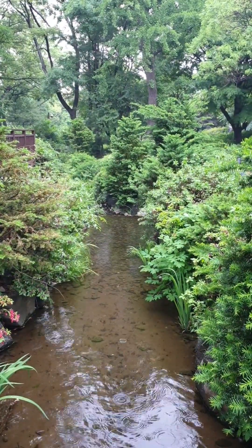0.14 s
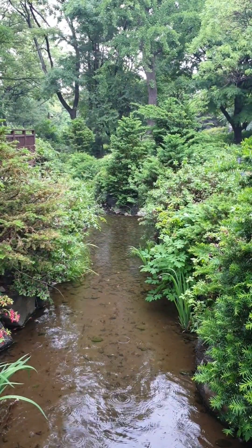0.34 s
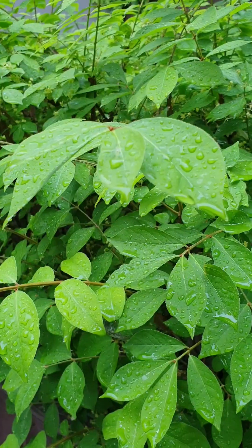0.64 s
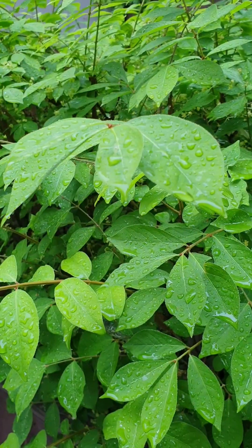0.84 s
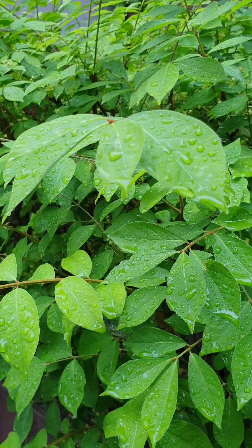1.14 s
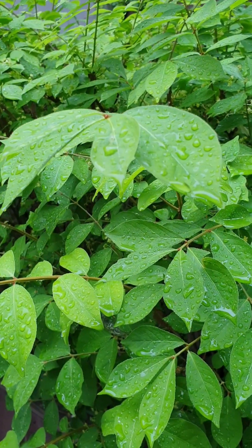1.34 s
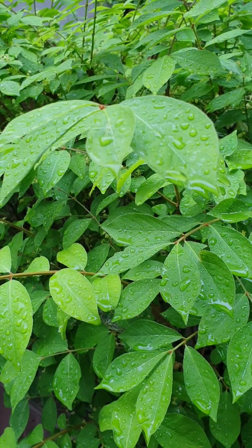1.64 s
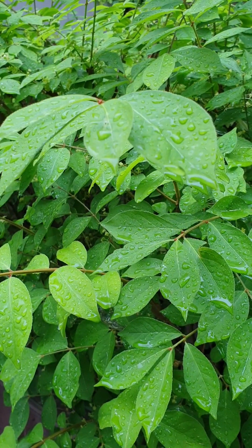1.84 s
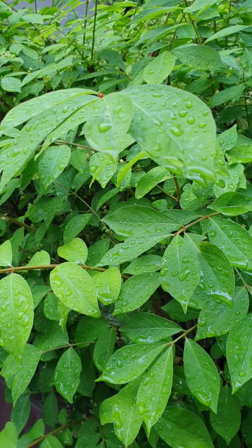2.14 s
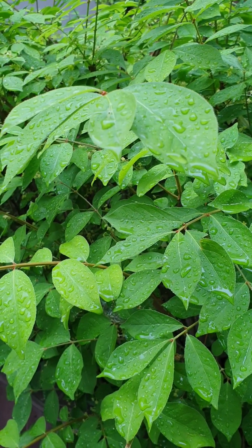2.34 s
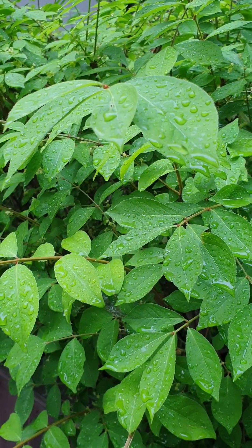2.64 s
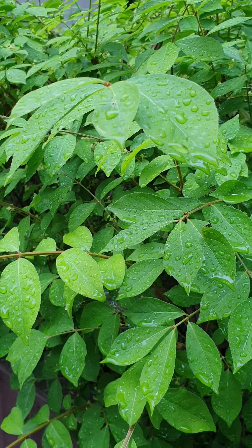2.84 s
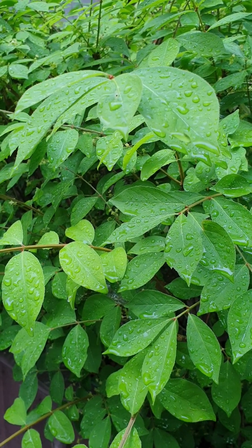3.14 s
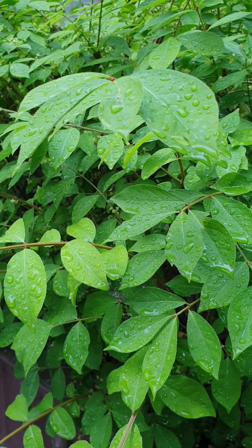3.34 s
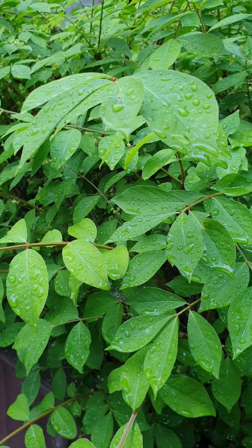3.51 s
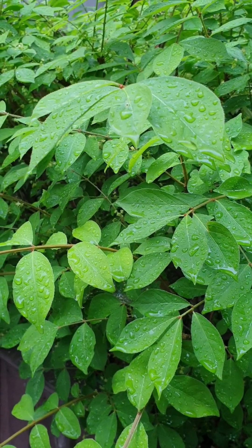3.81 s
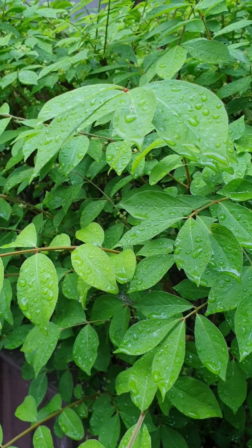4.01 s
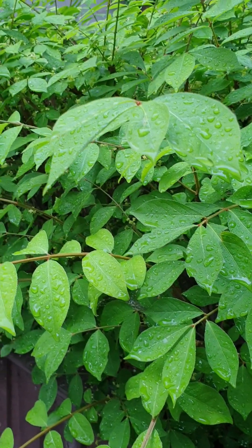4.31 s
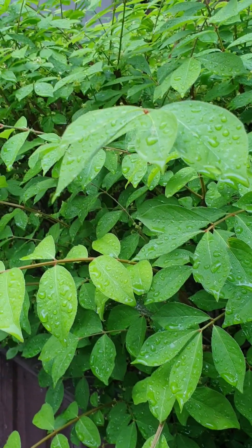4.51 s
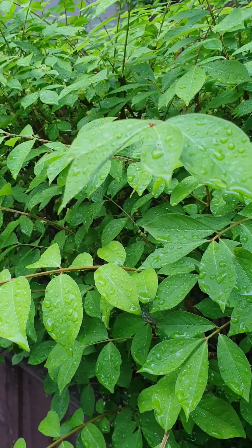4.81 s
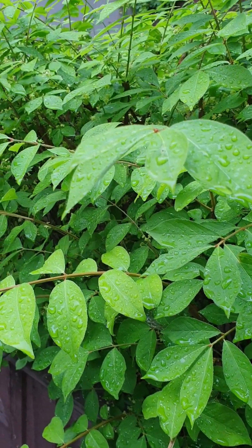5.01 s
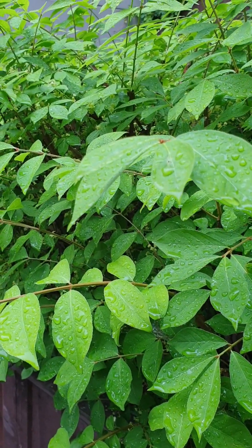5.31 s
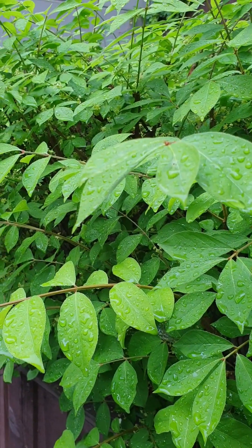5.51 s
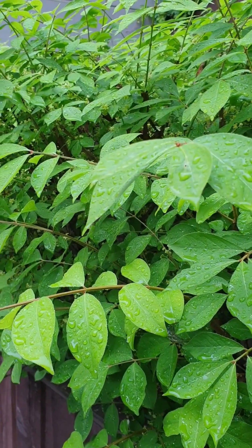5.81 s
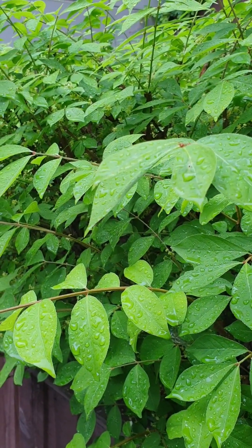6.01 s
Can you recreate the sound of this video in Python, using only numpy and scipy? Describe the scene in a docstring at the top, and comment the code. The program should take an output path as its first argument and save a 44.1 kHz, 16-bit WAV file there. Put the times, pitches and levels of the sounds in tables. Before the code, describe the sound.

Rushing, bubbly water fills both sides for half a second, then is chopped off. A far softer wet hush follows, with deep distant rumble and sparse, barely audible bird notes. From about two and a half seconds the level rises; gliding whistles, hoarse churrs and thin high seeps become clearer, blurred by foliage. Sharp little drops tap leaves on the right, more often near the end.

```python
"""Stream, then wet thicket

Close by a rain-fed stream, a roar of shaped noise under thousands of tiny bubbles is cut off after half a second.
After a short gap the microphones stand in a wet thicket: far rumble and hush are drifting noise,
whose recording level rises about 10 dB between 2.4 and 3.3 s.
Small birds near and far are gliding, fluttering sines blurred by scattering taps for the foliage.
Drops tick on leaves to the right, each a click ringing four damped modes."""
import sys
import numpy as np
from scipy import signal
from scipy.io import wavfile
from scipy.ndimage import uniform_filter1d

SR = 44100
rng = np.random.default_rng(int(sys.argv[2]) if len(sys.argv) > 2 else 0)


def dump_mix(stems):
    """Bounce the given channels to the path in sys.argv[1] as a 16-bit WAV at rate SR."""
    frames = np.atleast_2d(stems).T  # one column per channel
    limited = np.clip(frames, -1, 1)  # hard clip at full scale
    pcm = np.round(limited * 32767).astype(np.int16)
    wavfile.write(sys.argv[1], SR, pcm)


N = 271215  # samples, 6.15 s

# Relative spectrum of the close stream: (frequency [Hz], density [dB per Hz])
STREAM_SPECTRUM = [(15, -37.5), (25, -9), (69, 0), (124, -9.5), (184, -8), (267, -14), (331, -10),
                   (594, -14), (2080, -14.5), (3630, -16), (7070, -17), (11700, -20), (14500, -25)]
# Likeness of the stream's two channels: (frequency [Hz], correlation [-1 to 1])
STREAM_LIKENESS = [(60, 0.9), (120, 0.91), (240, 0.88), (470, 0.67), (930, 0.2), (1850, 0.16),
                   (3660, 0.082), (7270, 0.08), (14400, 0.01)]
# Sideways balance of the stream: (frequency [Hz], left minus right [dB])
STREAM_BALANCE = [(60, -2), (150, 0), (370, 0.5), (930, 1.5), (2320, -4.5), (5790, 2), (14400, 0.5)]
# Relative spectrum of the thicket air before the level rise: (frequency [Hz], density [dB per Hz])
HUSH_SPECTRUM = [(20, -35), (38, -12.5), (58, 2.5), (85, -9.5), (130, -11), (220, -16.5), (560, -32.5),
                 (860, -27.5), (1500, -41), (2800, -48), (5000, -49.5), (8600, -63.5), (12000, -53.5),
                 (14500, -55.5)]
# Likeness of the thicket's two channels: (frequency [Hz], correlation [-1 to 1])
HUSH_LIKENESS = [(60, 0.87), (120, 0.97), (240, 0.93), (470, 0.58), (930, 0.4), (1850, 0), (3660, 0.01),
                 (7270, 0.071), (14400, 0.0)]
# Sideways balance of the thicket air: (frequency [Hz], left minus right [dB])
HUSH_BALANCE = [(60, -1), (180, -2), (540, 3), (1610, -3), (4820, -1), (14400, -1.0)]
# Thicket level over time:
# (time [s], hush level [dB], extra rumble [dB], extra birdsong haze [dB], extra hiss [dB])
THICKET_LEVEL = [(.62, -74, 0.5, 2.5, 0.5), (1.4, -73, -3, -3, 2.5), (2.2, -73, 2, -2.5, 1),
                 (2.45, -72.5, -1, 1, 3), (2.62, -69.5, -1, 7.5, -2.5), (2.9, -66, 2, -2, 2.5),
                 (3.3, -63.5, -4, 2.5, 4.5), (3.7, -64, 2, 8.5, 6), (3.9, -63.5, 1, 5.5, -3),
                 (4.5, -63.5, 0.5, 1, 3.5), (5, -63.5, -7.5, 5.5, 1), (5.5, -64.5, 1.5, 4, -0.5),
                 (5.85, -63, -3, 0.5, 2.5), (6.15, -64, -2, 3, 0)]
# Drops landing on leaves, before panning and scatter:
# (time [s], peak level [dB], left minus right [dB], brightness [dB per octave])
LEAF_DROPS = [(0.733, -70, -11, -4), (0.9438, -66, -5.5, -3), (0.965, -64, -4.5, -5), (1.1744, -72, -2, 1),
              (1.5494, -68, -1.0, 1), (1.5953, -63, -15, -8), (2.4546, -64, -10, -4),
              (2.5222, -59.5, -2.0, -1), (3.4299, -62, -3.5, 6), (3.5357, -55, -2, 7), (3.7636, -57, -4, 1),
              (4.196, -56, -3.5, -2), (4.7084, -62, -3.0, 4), (4.9504, -53, -11, 1.5),
              (5.007, -57.5, -15, -5), (5.21, -55, -14, 0), (5.2839, -52, -8, -5), (5.3467, -54, -2.0, 1),
              (5.7228, -48.5, -9, -2.5), (5.7584, -55, -3, -1), (5.8552, -57.5, -4.0, -5)]
# Ringing modes of a leaf: (frequency [Hz], width [Hz], relative level [dB])
LEAF_MODES = [(2580, 1300, 2.5), (3920, 1100, -10), (6810, 550, -11), (11700, 1700, -9)]
# Hoarse two-voiced churrs, upper voice before panning and scatter:
# (time [s], level [dB], start pitch [Hz], length [s], lower voice against upper [dB])
CHURR_CALLS = [(0.816, -78, 4230, .04, -10), (1.561, -82, 4290, .065, -5), (2.514, -77, 4400, .045, -5),
               (3.016, -81, 4200, 0.1, 8.5), (3.442, -72.5, 4220, 0.083, 3.5),
               (3.961, -65.5, 4220, 0.098, -3), (4.515, -63.5, 4250, 0.073, -3.5),
               (4.72, -67, 4740, .082, -3), (5.187, -61, 4150, 0.055, -2.5), (5.95, -63.5, 4315, 0.052, -2),
               (5.992, -70.5, 4100, 0.073, 3.5)]
# Notes of three far birds, level at the note's start before waver, panning and leaves:
# (time [s], length [s], level [dB], start pitch [Hz], end pitch [Hz])
CHUP_NOTES = [(.83, 0.16, -85.5, 2900, 2660), (1.61, .17, -84.5, 2800, 2500),
              (2.55, 0.067, -81, 2900, 2700), (2.78, 0.12, -82.5, 2900, 2880),
              (4.29, 0.21, -74.5, 3260, 3200), (4.58, 0.18, -71, 2960, 3200),
              (4.74, 0.085, -71, 2820, 2650), (4.84, .15, -76, 2895, 2880), (5.0, 0.15, -80.5, 2790, 2910),
              (5.235, 0.057, -69, 2793, 2770), (5.35, 0.13, -76.5, 2640, 2540), (5.6, .1, -75, 3050, 2990),
              (5.69, .11, -75, 2884, 2300)]
WHISTLE_NOTES = [(.85, .08, -83, 4000, 4150), (.96, 0.077, -82, 4090, 4070), (1.3, .04, -94, 4100, 4080),
                 (1.36, 0.072, -88, 4060, 4000), (2.22, 0.11, -88, 4360, 3870),
                 (2.39, .11, -95, 4180, 4080), (2.56, .08, -80, 3980, 4280), (2.63, .11, -70.5, 4260, 4490),
                 (2.74, 0.097, -78, 4300, 4260), (2.97, .18, -71, 4300, 4610),
                 (3.17, 0.16, -75.5, 4410, 4280), (3.34, .11, -69, 4310, 4530),
                 (3.45, .09, -68, 4400, 4210), (3.56, .09, -69, 4250, 4420), (3.66, 0.14, -71, 4290, 4390),
                 (3.845, 0.067, -65, 4330, 4350), (4.02, .17, -65, 4040, 4430),
                 (4.22, .13, -61, 3840, 4290), (4.33, .19, -65.5, 4310, 4140), (4.56, .15, -63, 3800, 4300),
                 (4.7, .15, -66.5, 4250, 4150), (5.01, .09, -74, 3860, 3900), (5.1, .09, -69, 4180, 4150),
                 (5.23, 0.063, -71, 4200, 4080), (5.38, 0.2, -74, 4400, 4330),
                 (5.575, .09, -69, 3780, 3910), (5.88, 0.065, -71, 4400, 4250)]
SEEP_NOTES = [(3.55, 0.085, -71.5, 6440, 6600), (3.65, 0.18, -74.5, 6760, 5900),
              (3.66, .13, -68, 4840, 5090), (3.845, 0.088, -73.5, 6350, 6600),
              (3.95, 0.078, -73, 6110, 5780), (4.06, .14, -85, 5850, 6000), (4.72, 0.1, -72, 5930, 5750),
              (4.847, 0.063, -69.5, 6230, 6000), (4.867, .09, -70, 4370, 5950),
              (4.96, 0.097, -72, 6700, 6600), (5.08, .2, -77, 6640, 6220), (5.91, .15, -74.5, 5660, 5700)]
# Low falling chucks, upper voice before panning and scatter: (time [s], level [dB])
CHUCK_CALLS = [(1.011, -74.5), (1.291, -74), (1.366, -70.5), (2.291, -79), (2.659, -63), (2.744, -60.5)]
# Clear single-voiced pipes, before panning and scatter:
# (time [s], level [dB], start pitch [Hz], end pitch [Hz], length [s])
PIPE_CALLS = [(2.999, -80.5, 3800, 3800, .04), (4.044, -71, 3880, 4470, .12),
              (4.203, -64.5, 3800, 4320, 0.12), (4.562, -69, 3810, 4430, 0.13),
              (4.693, -73, 3150, 3120, .05), (4.97, -78.5, 6770, 6900, 0.14),
              (5.013, -75, 3800, 3790, 0.036), (5.203, -60, 3880, 3850, 0.016),
              (6.03, -72, 3440, 3550, .03), (6.065, -69, 3680, 3800, .045)]

HOP = 1024  # samples between short-time spectra
RUSH_DB, FIZZ_DB = -29, -8  # whole stream rms; bubbles against the roar
FIZZ_PER_S = 4000  # average bubbles per second in each channel
CUT_S, CUT_DB, CUT_DB_PER_S, GONE_S = 0.558, -9, 702.5, 0.579  # stream drops, fades, is silent
HUSH_START_S = 0.614
NOTE_END_S, NOTE_WAVER_DB = 0.015, 3  # closing ramp; rms level waver of far notes
EDGE_HZ = 14600  # upper band limit


def gain_of(db):
    """Decibels to gain."""
    return 10 ** (np.asarray(db) / 20)


def evened(x):
    """Scales to rms 1."""
    return x / np.sqrt(np.mean(x ** 2) + 1e-20)


def read(points, hz):
    """Reads a curve on a log-frequency axis."""
    f, value = np.transpose(points)
    return np.interp(np.log(hz + 1), np.log(f + 1), value)


def add(mix, s, sound):
    """Mixes a stereo sound in at time s, cut at the end of the mix."""
    part = mix[:, round(s * SR):][:, :sound.shape[1]]
    part += sound[:, :part.shape[1]]


def panned(x, pan_db):
    """Splits the left-right level difference over both channels."""
    return np.array([x * gain_of(pan_db / 2), x * gain_of(-pan_db / 2)])


def flutter(n, smooth_s):
    """Random wandering of rms 1: white noise through a one-pole smoother."""
    return evened(signal.lfilter([1], [1, -np.exp(-1 / (smooth_s * SR))], rng.standard_normal(n)))


def noise(colour, likeness, balance, patchy_db, n):
    """Random stereo short-time spectra with drifting patches: (Hz, s, spectra)."""
    frames = n // HOP + 5
    hz = np.fft.rfftfreq(4 * HOP, 1 / SR)
    t = np.arange(frames) * HOP / SR
    a, b, c, d, patches = rng.standard_normal((frames, len(hz), 5)).T
    patches = uniform_filter1d(patches, size=3, axis=1)  # across time
    patches = evened(uniform_filter1d(patches, size=40, axis=0))  # across frequency
    like = np.clip(read(likeness, hz), -1, 1)[:, None]
    left = a + 1j * b
    right = like * left + np.sqrt(1 - like ** 2) * (c + 1j * d)
    level = gain_of(read(colour, hz)[:, None] + patchy_db * patches)
    return hz, t, np.array([left, right]) * panned(level, read(balance, hz)[:, None])


def sound_of(spectra, n):
    """Short-time spectra back to n samples."""
    return signal.istft(spectra, nperseg=4 * HOP, noverlap=3 * HOP)[1][:, :n]


def foliage(x, t60):
    """Leaves as sparse scattering taps of random sign, different for each ear, decaying 60 dB in t60 s."""
    slots = np.arange(40, SR // 2, 20)
    at = slots + rng.integers(0, 20, (2, len(slots)))
    taps = np.zeros((2, SR // 2 + 40))
    strength = rng.choice([-1., 1.], at.shape) * gain_of(-60 * at / SR / t60)
    np.put_along_axis(taps, at, strength, 1)
    return signal.fftconvolve(x, taps / np.linalg.norm(taps[0]), axes=1)[:, :N]


def scattered(song, near_db, near_t60, far_db, far_t60):
    """Near leaves scatter a song and far trees hold a tail."""
    return song + gain_of(near_db) * foliage(song, near_t60) + gain_of(far_db) * foliage(song, far_t60)


def chirp(level_db, start_hz, end_hz, length, pan_db, lower, hoarse_hz):
    """One sweep with random pitch wander; the lower half of the voice box joins with the given gain."""
    u = np.arange(0, 1, 1 / (length * SR))
    hz = start_hz * (end_hz / start_hz) ** u
    upper_cycles, lower_cycles = (
        np.cumsum(ratio * hz + hoarse_hz * flutter(len(u), smooth_s=0.000967)) / SR for ratio in (1, 0.73))
    voice = np.sin(2 * np.pi * upper_cycles) + lower * np.sin(2 * np.pi * lower_cycles)
    return panned(gain_of(level_db) * voice * np.sin(np.pi * u ** 0.87), pan_db)


def far_note(row, bend, rise_s, fade_db, flutter_hz, smooth_s):
    """A near-sine voice whose pitch glides and flutters quickly at random."""
    s, length, level_db, start_hz, end_hz = row
    t = np.arange(0, length, 1 / SR)
    hz = start_hz + (end_hz - start_hz) * (t / length) ** bend
    hz = hz + flutter_hz * flutter(len(t), smooth_s)
    voice = np.sqrt(2) * np.sin(2 * np.pi * np.cumsum(hz) / SR)
    level_db = level_db + fade_db * t / length + NOTE_WAVER_DB * flutter(len(t), smooth_s=0.012)
    ramps = np.clip(np.minimum(t / rise_s, (length - t) / NOTE_END_S), 0, 1)
    return s, gain_of(level_db) * voice * ramps


def far_bird(notes, pan_db, t60, direct_db, **voice_settings):
    """One bird's notes from its perch, mostly heard through leaves."""
    song = np.zeros((2, N))
    for row in notes:
        s, voice = far_note(row, **voice_settings)
        add(song, s, panned(voice, pan_db))
    return gain_of(direct_db) * song + foliage(song, t60)


def bubbles(n):
    """Tiny bubbles of about six cycles and rising pitch, at random times and sizes."""
    fizz = np.zeros((2, n))
    for hz in np.geomspace(900, 12000, num=24):
        u = np.arange(0, 6, hz / SR)
        bubble = np.sin(2 * np.pi * u * (1 + 0.02 * u)) * np.sin(np.pi * u / 6) ** 2
        size = gain_of(6.0 * np.minimum(rng.exponential(1, (2, n)), 5))
        size *= rng.random((2, n)) < FIZZ_PER_S / 24 / SR
        level = gain_of(read(STREAM_SPECTRUM, hz)) * np.sqrt(hz)
        fizz += level * signal.oaconvolve(size, bubble[None])[:, :n]
    return fizz


def stream():
    """Close rushing water: a broad noise roar plus bubbles, cut off abruptly."""
    n = SR * 2 // 3
    spectra = noise(STREAM_SPECTRUM, STREAM_LIKENESS, STREAM_BALANCE, patchy_db=1.5, n=n)[2]
    roar = evened(sound_of(spectra, n))
    water = evened(roar + gain_of(FIZZ_DB) * evened(bubbles(n)))
    t = np.arange(n) / SR
    level_db = RUSH_DB + (t > CUT_S) * (CUT_DB - CUT_DB_PER_S * (t - CUT_S))
    return (t < GONE_S) * gain_of(level_db) * water


def hush():
    """Far rumble, mid wash, a haze of distant birdsong and hiss share one level rise and drift around it."""
    hz, t, spectra = noise(HUSH_SPECTRUM, HUSH_LIKENESS, HUSH_BALANCE, patchy_db=1.5, n=N)
    s, *columns = np.transpose(THICKET_LEVEL)
    level_db, rumble_db, haze_db, hiss_db = (np.interp(t, s, column) for column in columns)
    # soft weights: 1 below each edge, 0 well above it
    low, mid, high = (1 / (1 + (hz[:, None] / edge_hz) ** 4) for edge_hz in (150, 1900, 7800))
    drift_db = low * rumble_db + (high - mid) * haze_db + (1 - high) * hiss_db
    air = sound_of(spectra * gain_of(level_db + drift_db), N)
    # the hush level refers to this band before the level rise
    wash = sound_of(spectra * ((hz > 300) & (hz < 1500))[:, None], N)
    opening = np.clip((np.arange(N) / SR - HUSH_START_S) / 0.0017, 0, 1)
    return air / np.std(wash) * opening


def drops():
    """Each drop is a click that rings the damped leaf; bright drops favour the upper modes."""
    out = np.zeros((2, N))
    t = np.arange(600) / SR
    for s, peak_db, pan_db, bright_db in LEAF_DROPS:
        tick = np.zeros(len(t))
        for hz, width, db in LEAF_MODES:
            level = gain_of(db + bright_db * np.log2(hz / 4000))
            tick += level * np.exp(-np.pi * width * t) * np.sin(2 * np.pi * hz * t)
        tick *= 1 - np.exp(-t / 0.0003)  # the drop spreads as it lands
        add(out, s, panned(gain_of(peak_db) * tick / abs(tick).max(), pan_db))
    return out + gain_of(-8.0) * foliage(out, t60=0.02)


def churrs():
    """Hoarse churrs from mid-thicket: two falling voices whose pitch wanders fast."""
    song = np.zeros((2, N))
    for s, level_db, hz, length, lower_db in CHURR_CALLS:
        add(song, s, chirp(level_db, hz, hz * 0.86, length, pan_db=-3.5, lower=gain_of(lower_db), hoarse_hz=270))
    return scattered(song, near_db=-1.0, near_t60=0.14, far_db=-1.0, far_t60=0.6)


def chups():
    """A far bird to the right: low notes near 3 kHz with quick pitch flutter."""
    return far_bird(CHUP_NOTES, pan_db=-11, bend=0.9, rise_s=0.013, fade_db=-7, flutter_hz=262,
                    smooth_s=0.00094, t60=0.94, direct_db=-4.0)


def whistles():
    """A far bird near the centre: gliding notes near 4 kHz that bend early and open slowly."""
    return far_bird(WHISTLE_NOTES, pan_db=0.8, bend=0.45, rise_s=0.029, fade_db=-7, flutter_hz=226,
                    smooth_s=0.00123, t60=0.43, direct_db=-8.0)


def chucks():
    """One bird to the right repeats the same short falling two-voiced call."""
    song = np.zeros((2, N))
    for s, level_db in CHUCK_CALLS:
        add(song, s, chirp(level_db, start_hz=2700, end_hz=2120, length=0.0476, pan_db=-14,
                           lower=gain_of(-11.5), hoarse_hz=168))
    return scattered(song, near_db=0.5, near_t60=0.09, far_db=-8, far_t60=0.59)


def pipes():
    """Clear pipes from mid-thicket: one voice with little pitch wander."""
    song = np.zeros((2, N))
    for s, level_db, start_hz, end_hz, length in PIPE_CALLS:
        add(song, s, chirp(level_db, start_hz, end_hz, length, pan_db=0, lower=0, hoarse_hz=40))
    return scattered(song, near_db=-1.0, near_t60=0.14, far_db=-1.0, far_t60=0.6)


def seeps():
    """A far bird to the left: thin high notes, mostly near 6 kHz, with strong pitch flutter."""
    return far_bird(SEEP_NOTES, pan_db=9, bend=0.9, rise_s=0.01, fade_db=-10.5, flutter_hz=333,
                    smooth_s=0.00094, t60=1.0, direct_db=-3.5)


def scene():
    """The close stream first, then the thicket."""
    mix = np.zeros((2, N))
    add(mix, 0, stream())
    mix += hush() + drops()
    mix += churrs() + chups() + whistles()
    mix += chucks() + pipes() + seeps()
    return mix


def record(dry):
    """The microphone drops the deepest bass; then the band limit."""
    thin = signal.sosfilt(signal.butter(2, 40, "highpass", fs=SR, output="sos"), dry)
    band_limit = signal.firwin(511, EDGE_HZ, window=("kaiser", 9), fs=SR)
    return signal.oaconvolve(thin, band_limit[None], "same")


dry = scene()
out = record(dry)
dump_mix(out)
```